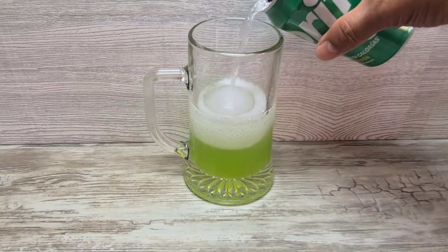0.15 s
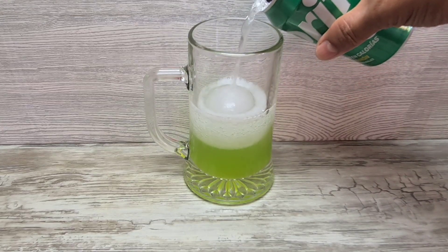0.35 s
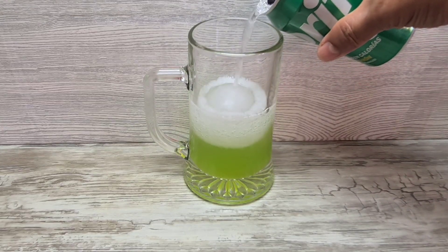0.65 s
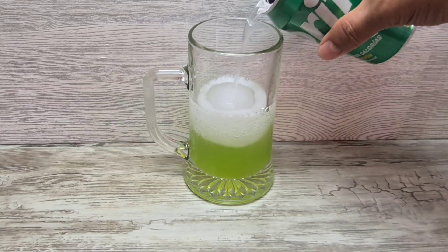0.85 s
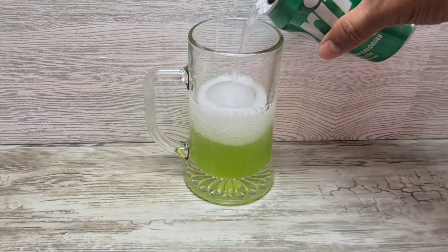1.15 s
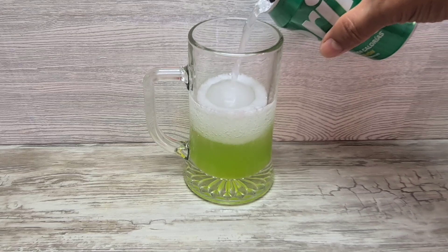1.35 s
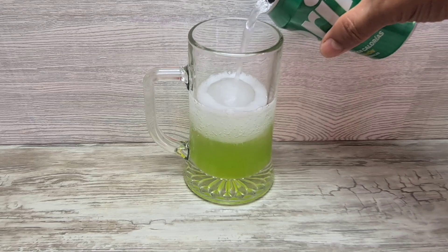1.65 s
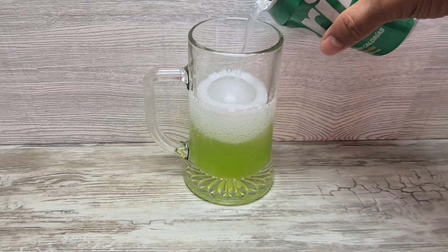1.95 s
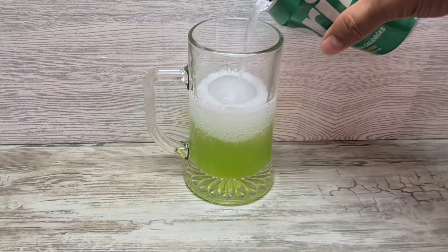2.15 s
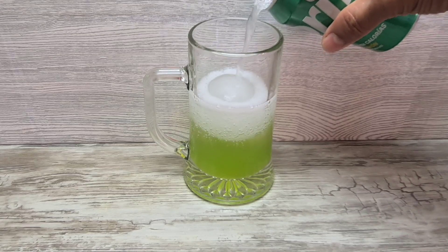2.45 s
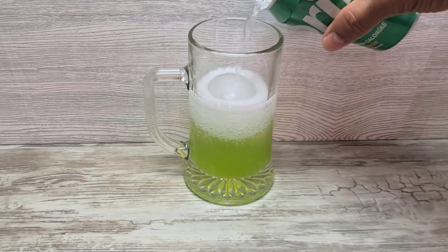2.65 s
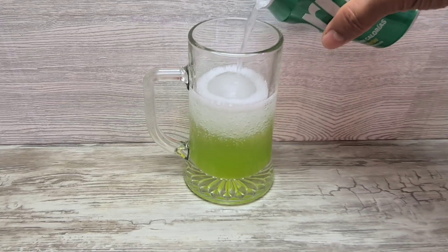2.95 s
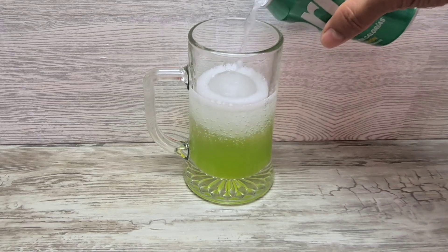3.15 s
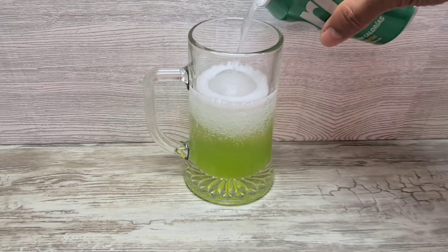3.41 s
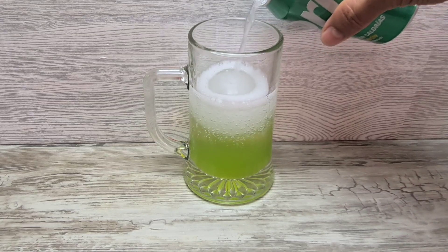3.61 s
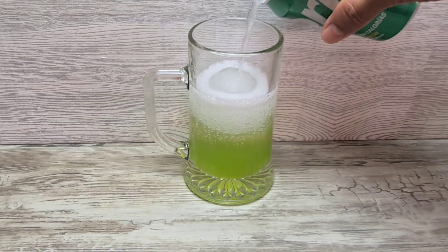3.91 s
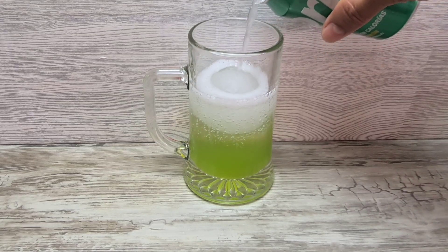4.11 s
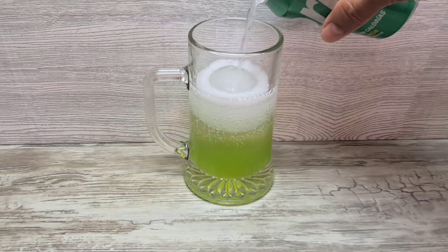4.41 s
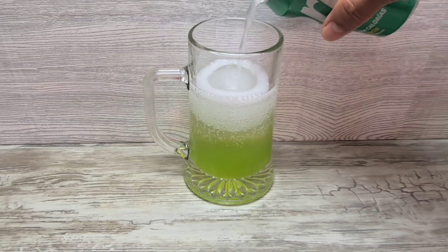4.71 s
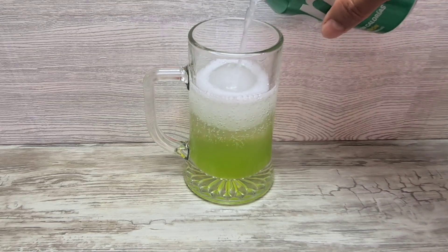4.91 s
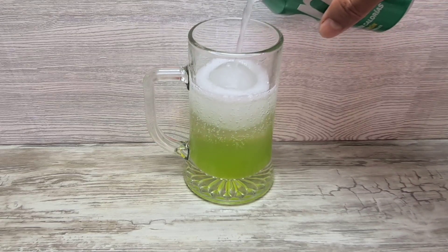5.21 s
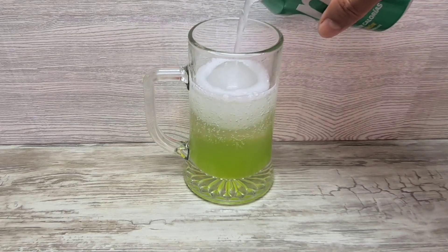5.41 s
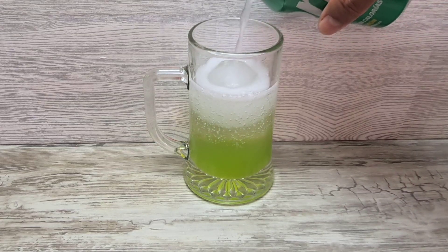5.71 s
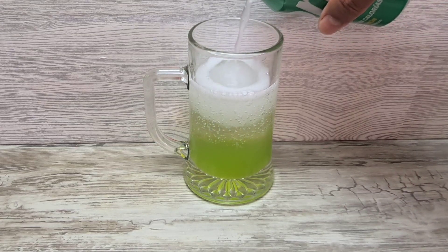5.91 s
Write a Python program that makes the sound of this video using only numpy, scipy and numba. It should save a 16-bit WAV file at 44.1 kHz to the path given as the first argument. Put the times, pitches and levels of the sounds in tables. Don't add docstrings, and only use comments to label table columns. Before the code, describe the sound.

Close up in a small quiet room, fizzy drink pours continuously into a half-full glass mug. Countless tiny bubbles make a wavering, wide hiss over a resonant mid-pitched burble. Crisp pops snap early, then become sparse; the can blips softly as it takes in air. Faint low house rumble lies beneath, with a muffled thump late on. The pour is still running at the end, heard by a nearby stereo phone.

```python
import sys
import numpy as np
from scipy import signal
from scipy.fft import rfft, irfft, next_fast_len
from scipy.io import wavfile
from scipy.ndimage import uniform_filter1d
from numba import njit

SR = 44100
rng = np.random.default_rng(int(sys.argv[2]) if len(sys.argv) > 2 else 0)


def invert_db(level):
    return 10 ** (np.asarray(level, dtype=float) / 20)


def pcm_store(signal):
    levels = np.round(np.clip(np.atleast_2d(signal), -1, 1) * 32767)
    wavfile.write(sys.argv[1], SR, levels.astype(np.int16).T)


N = 267246
TIME_S = np.arange(N) / SR
SIZE = next_fast_len(N + SR)
HZ = np.arange(SIZE // 2 + 1) * SR / SIZE
PORT_LAG_S = 0.00012
DRIVE_REF_DB = -50

# time in seconds, foam drive of the air column in dB, stream strength in dB.
POUR_COURSE = [(0.0, -56.5, -0.5), (0.3, -54.5, -0.5), (0.67, -57.5, -1), (1.05, -53.5, 0), (1.35, -54, 0),
               (1.65, -50.5, 0), (1.95, -51, 0), (2.25, -50.5, 0.5), (2.47, -46, 0.5), (2.9, -46.5, 0),
               (3.2, -46.5, -0.5), (3.4, -47.5, 0), (3.9, -46, 0), (4.3, -43, 0.5), (4.75, -44.5, 0),
               (5.2, -48, 0.5), (5.6, -47.5, 0), (6.06, -46.5, 0.5)]


def through(x, response):
    return irfft(rfft(x, SIZE) * response, SIZE)[..., :N]


def level(x, db):
    return x * invert_db(db) / np.sqrt(np.mean(x ** 2))


def colour(points):
    hz, db = np.transpose(points)
    return invert_db(np.interp(np.log(HZ + 1), np.log(hz), db))


def modes(table):
    total = 0
    for k, (hz, width_hz, db) in enumerate(table):
        damping = 1j * HZ * width_hz
        total = total + (-1) ** k * invert_db(db) * damping / (hz ** 2 - HZ ** 2 + damping)
    return total


def curves(table):
    s, *columns = np.transpose(table)
    return [np.interp(TIME_S, s, column) for column in columns]


def walk(rate_hz):
    hold = int(SR / rate_hz)
    steps = np.repeat(rng.standard_normal(N // hold + 1), hold)
    return 1.3 * uniform_filter1d(uniform_filter1d(steps, hold), hold)[:N]


def swell(middle_s, db, length_s):
    return db * np.exp(-(2 * (TIME_S - middle_s) / length_s) ** 2)


@njit
def grains(n, start, hz, t60, size, rise, glide):
    out = np.zeros(n)
    for g in range(len(start)):
        phase, step = 0., 2 * np.pi * hz[g] / SR
        for i in range(min(int(t60[g] * SR), n - start[g])):
            t = i / SR
            phase += step * (1 + glide * t / t60[g])
            envelope = (1 - np.exp(-t / (rise * t60[g]))) * 1000 ** (-t / t60[g])
            out[start[g] + i] += size[g] * envelope * np.sin(phase)
    return out


def bursts(s, db, hz, pan_db, t60_s, rise, glide):
    start = (s * SR).astype(np.int64)
    left = grains(N, start, hz, t60_s, invert_db(db + pan_db / 2), rise, glide)
    right = grains(N, start, hz, t60_s, invert_db(db - pan_db / 2), rise, glide)
    return np.array([left, right])


def ports(x, share=1):
    lag_s = np.array([[0], [share * PORT_LAG_S]])
    return through(x, np.exp(-2j * np.pi * HZ * lag_s))


def unlike(corner_hz):
    return np.array([[1], [-1]]) * HZ / np.sqrt(HZ ** 2 + corner_hz ** 2)


def room(x):
    t60_s, room_db = 0.16, -7
    t = np.arange(SR // 2) / SR
    tail = rng.standard_normal((2, len(t))) * 1000 ** (-t / t60_s) * (t > 0.003)
    mid, side = rfft(tail / np.sqrt(np.sum(tail ** 2)), SIZE)
    return invert_db(room_db) * through(x, mid + unlike(490) * side)


def fizz(cycles, spread_db, count=50000):
    when, pitch, odd = rng.random((count, 3)).T
    hz = 600 + 16500 * pitch
    size = invert_db(-spread_db * np.log(1 - odd)) * np.sqrt(hz / 8000)
    return grains(N, (when * N).astype(np.int64), hz, cycles / hz, size, 0.025, 0.29)


def mug_air(centre, rim, deep_db, stream_db, surge):
    # frequency in Hz, width in Hz, level in dB.
    column_modes = [(813, 23, -19), (1063, 48, -5.5), (1203, 163, -8), (1319.6, 72.4, 4), (1426, 29, -3.5),
                    (1444, 17.6, -0.5), (1607, 13, -10.5)]
    next_modes = [(1736, 97, 2.5), (1906, 130, -4.5), (2053, 60, 2.5), (2140, 61, -1)]
    mouth_modes = [(2340, 65, -8.5), (2520, 46, -8), (2784, 116, -1), (2912, 101, 2), (3057, 118, 2.5),
                   (3410, 190, -0.5), (3563, 163, -3.5), (3807, 103, -4.5), (7200, 120, -6),
                   (8220, 200, -8)]
    choked_modes = [(4220, 78, 9.5), (4900, 300, -0.5), (5900, 44, -9), (6540, 66, -1)]
    drive_db = deep_db - DRIVE_REF_DB
    next_db = -59 + 0.51 * drive_db + 1.43 * TIME_S
    mouth_db = -45.5 - 0.27 * drive_db + 2.0 * stream_db
    choked_db = -61.5 - 1.1 * (deep_db + 47.5)
    low = ports(centre, share=0.59) + invert_db(-5.5) * rim
    high = ports(centre, share=0.38) + invert_db(-2.5) * rim
    mug = level(through(low, modes(column_modes)), deep_db + 1.64 + 1.0 * walk(10))
    mug = mug + level(through(low, modes(next_modes)), next_db + 0.78 * walk(11))
    mug = mug + level(through(high, modes(mouth_modes)), mouth_db + 0.3 * surge + 0.6 * walk(13))
    return mug + level(through(high, modes(choked_modes)), choked_db + 0.31 * surge)


def foam_hiss(centre, rim, stream_db, surge):
    # frequency in Hz, density in dB per Hz.
    left_colour = [(900, -54), (2000, -6), (3700, -4.5), (4600, -2), (7000, -1), (8500, -8.5), (11000, -6),
                   (15000, -6.5)]
    right_colour = [(900, -13.5), (2000, -8), (3700, -6), (4600, 1), (7000, -3), (7700, -4.5), (9000, -6),
                    (11500, -3.5), (13000, -6), (15000, -8)]
    echo_s, echo_turn_rad, echo_db = 0.001356, 2.76, -13.5
    echo_gain = invert_db(echo_db) / (1 + (HZ / 7500) ** 4)
    comb = 1 + echo_gain * np.exp(-2j * np.pi * HZ * echo_s - 1j * echo_turn_rad)
    tint = comb * np.array([colour(left_colour), colour(right_colour)])
    source = invert_db(-3) * ports(centre[::-1]) + rim[::-1]
    waver_db = 0.4 * surge + 0.5 * walk(16)
    hiss = level(through(source, tint), -41.5 + stream_db + waver_db)
    return hiss + (invert_db(0.9 * walk(10)) - 1) * through(hiss, HZ > 9500)


def pour():
    # frequency in Hz, width in Hz, depth from 0 to 1.
    notches = [(935, 39, 1), (1659, 143, 0.81), (2284, 42, 0.54), (3650, 40, 0.46), (3937, 176, 0.47),
               (5400, 160, 0.48), (7730, 140, 0.28)]
    deep_db, stream_db = curves(POUR_COURSE)
    surge = walk(6)
    centre = fizz(5.8, 1.08)
    rim = np.array([fizz(6.6, 1.07) for _ in range(2)])
    mug = mug_air(centre, rim, deep_db, stream_db, surge)
    hiss = foam_hiss(centre, rim, stream_db, surge)
    dips = 1
    for hz, width_hz, depth in notches:
        dips = dips * (1 - np.clip(depth, 0, 0.9) / (1 + (2 * (HZ - hz) / width_hz) ** 2))
    return through(mug + invert_db(-5.5) * room(mug.mean(0)) + hiss, dips)


def patches():
    # start in seconds, level in dB, pitch in Hz, length in seconds.
    rushes = [(0.169, -34.5, 3200, 0.0073), (0.289, -40, 3300, 0.0031), (0.554, -35.5, 4630, .006),
              (0.619, -33.5, 5900, .008), (0.661, -38, 3030, 0.063), (0.69, -39.5, 3130, 0.0087),
              (0.796, -34.5, 5900, 0.0077), (1.83, -34, 6500, 0.0068), (2.956, -39, 7250, .008),
              (2.961, -37.5, 2620, .018), (5.489, -35.5, 3000, .04), (5.503, -32.5, 12600, 0.013)]
    s, db, hz, length_s = np.repeat(np.transpose(rushes), 12, axis=1)
    late, pitch, pan = rng.random((len(s), 3)).T
    hz = np.clip(hz * np.exp(0.07 * 4 * (pitch - 0.5)), 500, 15500)
    rush = bursts(s + late * length_s, db + 4, hz, 12 * (pan - 0.5), 24 / hz, 0.08, 0.03)
    return rush + invert_db(1) * room(rush.mean(0))


def pops():
    # start in seconds, peak in dB, pitch in Hz, left minus right in dB.
    large_bubbles = [(0.2245, -21.5, 8800, -12), (0.5390, -19, 11100, -15), (0.5801, -17.5, 8650, -6.6),
                     (0.5848, -33, 12450, 12), (0.592, -38, 12420, -0.5), (0.6262, -26.5, 8700, -5),
                     (0.6266, -30, 11610, 4), (0.7948, -32, 6720, 8), (0.8794, -30, 4830, -2.1),
                     (0.9182, -27, 6400, 0), (1.2897, -36, 8010, 9), (1.3822, -34, 13160, -1.9),
                     (1.7558, -17, 6940, 3), (1.818, -31, 4900, -5.4), (1.9214, -38, 13140, 7.9),
                     (2.3357, -28, 7900, 2.9), (2.444, -27, 12580, 13), (3.6458, -38, 12470, -12),
                     (4.0754, -27, 10570, -3.4), (4.139, -26, 10770, 4.2), (5.549, -31, 7500, 0),
                     (5.8107, -21, 12500, -13)]
    s, db, hz, pan_db = np.transpose(large_bubbles)
    pop = bursts(s, db + 3, hz, pan_db, 20 / hz + 0.0008, 0.1, 0.1)
    pop = pop + bursts(s + 0.0003, db - 1, np.minimum(1.27 * hz, 13500), pan_db, 13 / hz, 0.1, 0.1)
    pop = pop + bursts(s + 0.0005, db - 6, np.minimum(1.55 * hz, 13000), pan_db, 9 / hz, 0.1, 0.1)
    pop[1] = ports(pop[1])[1]
    board_echo = through(pop, invert_db(-7) * np.exp(-2j * np.pi * HZ * 0.0023))
    return pop + board_echo + invert_db(1) * room(pop.mean(0))


def gulps():
    # start in seconds, peak in dB, pitch in Hz, t60 in seconds.
    blips = [(0.22, -56, 525, 0.061), (0.731, -54, 512, 0.052), (1.222, -46, 486, 0.059),
             (1.243, -49, 470, 0.058), (1.545, -54, 577, 0.07), (3.031, -55, 470, 0.082),
             (3.249, -55, 418, 0.1), (3.399, -58, 412, 0.083), (3.785, -44.5, 542, 0.037),
             (3.982, -53.5, 411, 0.15), (5.187, -47, 492, 0.06), (5.233, -47, 425, 0.099),
             (5.252, -41, 408, 0.047), (5.326, -49, 434, 0.039), (5.438, -59, 452, 0.12),
             (5.489, -55, 445, 0.12), (5.623, -58, 371, 0.079), (5.728, -53, 370, 0.047),
             (5.797, -59, 364, 0.11), (5.87, -56, 370, 0.13)]
    pan_db = -2.5
    s, db, hz, t60_s = np.transpose(blips)
    gulp = bursts(s, db + 7.5, hz, pan_db, np.clip(t60_s, 0.01, 1), 0.072, 0.0093)
    tick = bursts(s, db + 3, 1.5 * hz, pan_db, np.full(len(s), 0.014), 0.05, -0.1)
    gulp = gulp + tick
    return gulp + invert_db(3) * room(gulp.mean(0))


def thud():
    # start in seconds, peak in dB, pitch in Hz, t60 in seconds, left minus right in dB.
    blows = [(1.216, -50, 1800, 0.04, 13), (1.225, -59, 694, 0.045, 0), (5.08, -50, 95, 0.22, 1),
             (5.225, -43, 160, 0.079, -1), (5.265, -50.5, 592, 0.25, -2), (5.275, -42, 151, 0.19, -4),
             (5.31, -36, 139, 0.074, -1), (5.344, -36, 107, 0.11, -4), (5.385, -38, 96, 0.1, -1),
             (5.421, -47.5, 148, 0.11, -4), (5.39, -53, 459, 0.46, -2), (5.483, -50, 111.6, 0.17, 3)]
    s, db, hz, t60_s, pan_db = np.transpose(blows)
    return invert_db(5.0) * bursts(s, db, hz, pan_db, np.clip(t60_s, 0.03, 1), 0.063, -0.093)


def bass_rumble():
    # frequency in Hz, width in Hz, level in dB.
    room_modes = [(53.5, 22.4, 2), (69.7, 24, 0.5), (88.7, 14.3, 1), (122.2, 6.3, -5.5), (146, 9.2, -6),
                  (173, 6.2, -27)]
    # middle in seconds, rise in dB, length in seconds.
    swells = [(0.09, 5.5, 0.7), (0.545, 1, 0.24), (1.0, 2, 0.13), (1.633, 8, 0.16), (1.98, 10, 0.062),
              (2.274, 6, 0.071), (2.78, 2, 0.13), (3.645, 2.5, 0.5), (4.14, 5, .12), (4.7, 4.5, 0.34),
              (5.363, 15, 0.28), (5.713, 5, .1)]
    bass_db = -63.5 + sum(swell(*row) for row in swells)
    mid, side = rng.standard_normal((2, N))
    band = HZ ** 2 / (HZ ** 2 + 45 ** 2) / (1 + (HZ / 190) ** 4)
    response = band * modes(room_modes)
    bass = through(mid, response) + 0.5 * through(side, unlike(15) * response)
    return level(bass, bass_db + 0.62 * walk(9.7))


def murk():
    # frequency in Hz, density in dB per Hz.
    murk_colour = [(100, -7), (170, -11.5), (254, -5), (301, -7.5), (513, -3.5), (680, -13.5), (819, -4),
                   (929, -14), (1000, -2.5), (1300, -70), (2200, -120)]
    # middle in seconds, rise in dB, length in seconds.
    sloshes = [
        (1.8, 3, .2),
        (2.5, 1, 0.25),
        (3.3, 2.5, 0.68),
        (4.194, 2, 0.31),
        (5.35, 7, 0.45),
    ]
    deep_db, _ = curves(POUR_COURSE)
    murk_db = -62 + 0.11 * (deep_db - DRIVE_REF_DB) + sum(swell(*row) for row in sloshes)
    mid, side = rng.standard_normal((2, N))
    tint = colour(murk_colour)
    noise = through(mid, tint) + 9 * through(side, unlike(1570) * HZ / (HZ + 1500) * tint)
    slot = np.clip(np.round(2 * np.log2((HZ + 1) / 220)), 0, 4)
    noise = sum(invert_db(2.2 * walk(11)) * through(noise, slot == k) for k in range(5))
    return level(noise, murk_db)


def scene():
    return pour() + patches() + pops() + gulps() + thud() + bass_rumble() + murk()


def roll_off(x):
    return signal.sosfilt(signal.butter(12, 15750, fs=SR, output="sos"), x)


def record(dry):
    top_hz = 15740
    return roll_off(through(dry, HZ < top_hz))


dry = scene()
out = record(dry)
pcm_store(out)
```